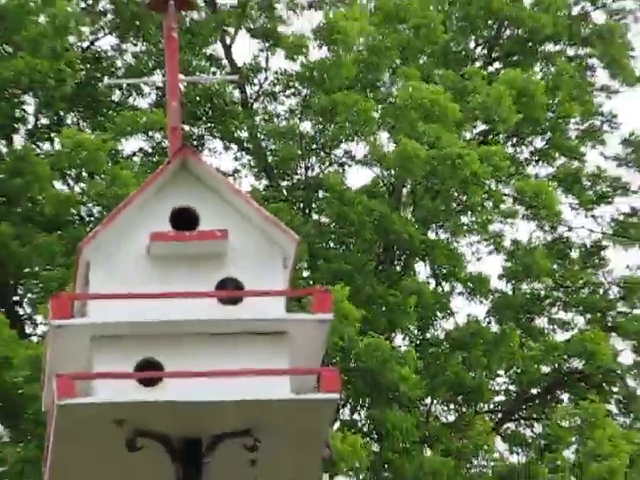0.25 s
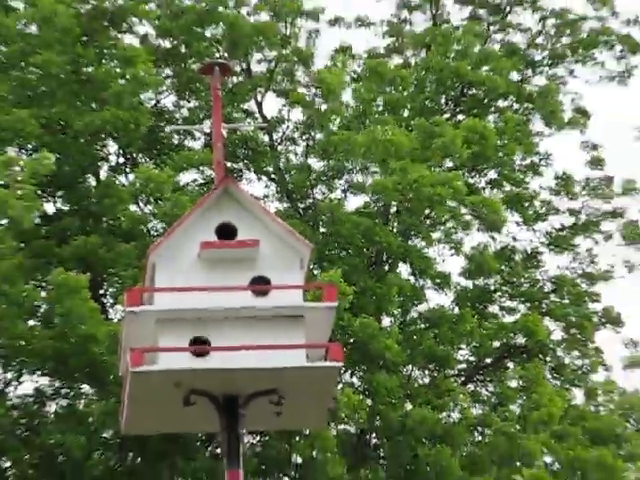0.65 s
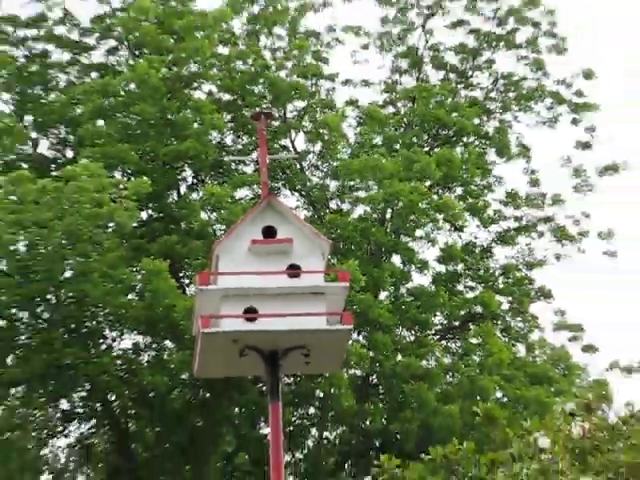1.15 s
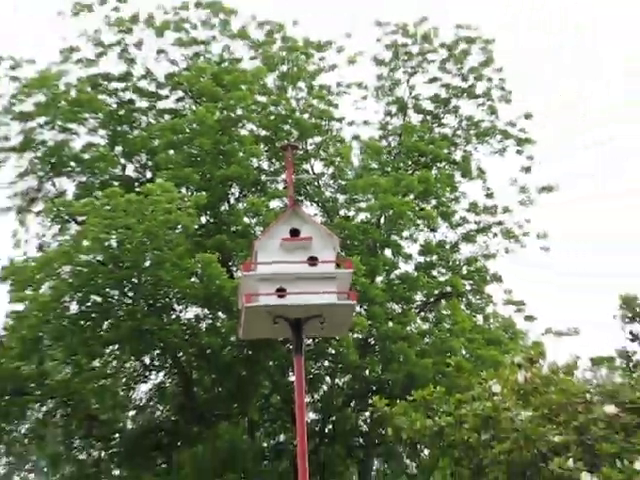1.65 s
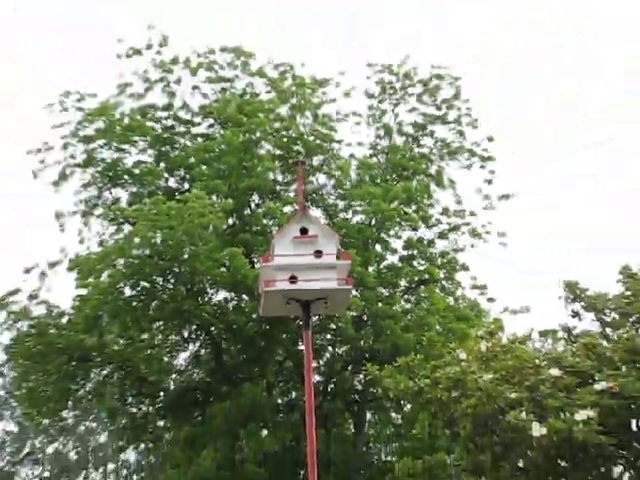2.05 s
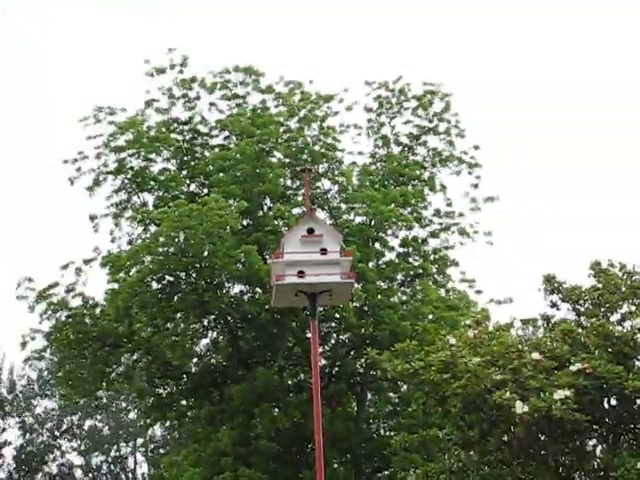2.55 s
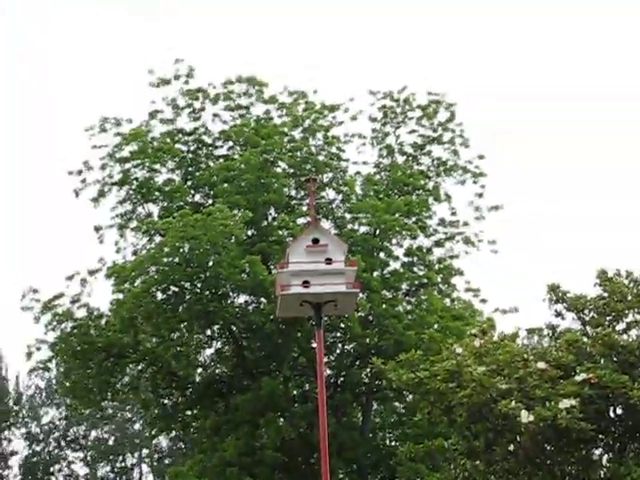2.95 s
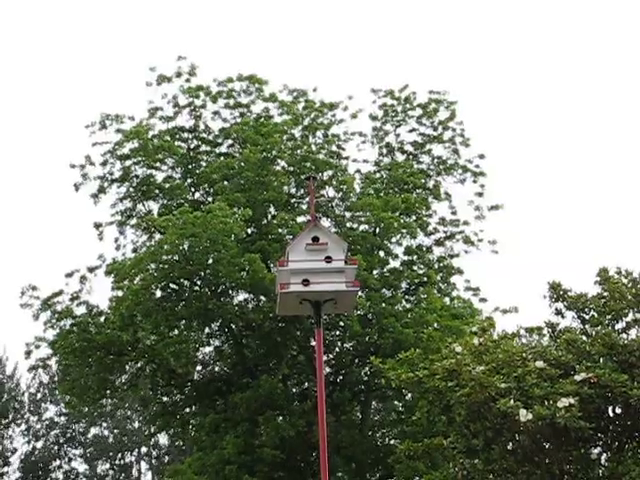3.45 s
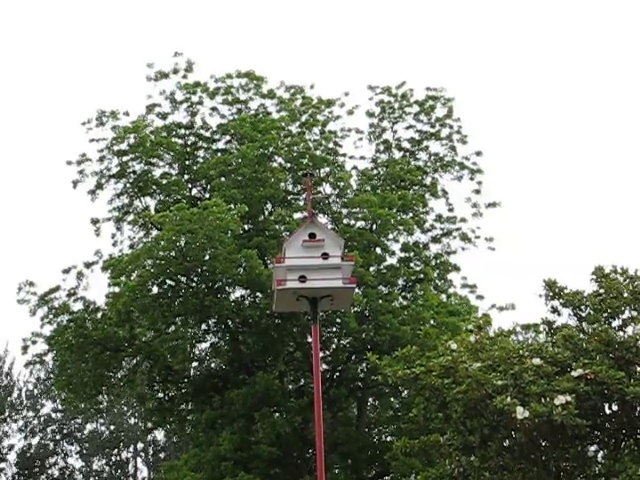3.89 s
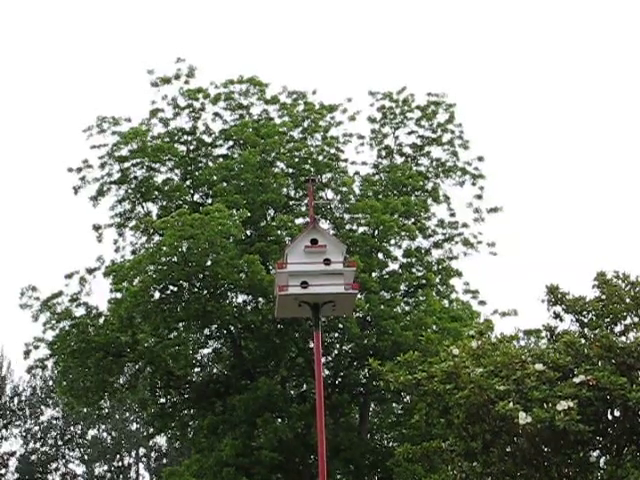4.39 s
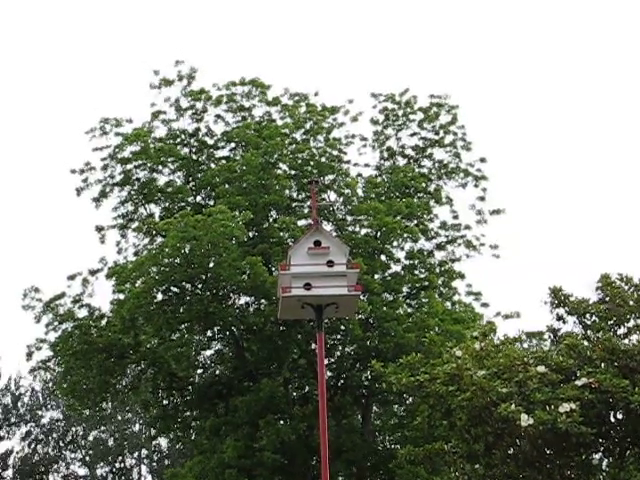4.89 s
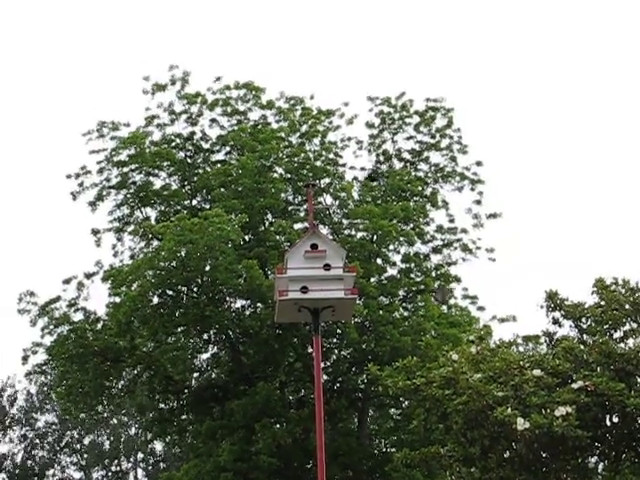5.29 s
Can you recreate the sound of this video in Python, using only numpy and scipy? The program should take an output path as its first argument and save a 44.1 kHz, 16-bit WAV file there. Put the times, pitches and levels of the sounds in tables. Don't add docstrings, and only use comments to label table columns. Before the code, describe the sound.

Purple-martin-like birds whistle, chatter and buzz around a nesting house, with loud swooping calls over soft leaf rustle and low distant engine rumble.

```python
import sys
import numpy as np
from scipy import signal
from scipy.fft import rfft, irfft, next_fast_len
from scipy.io import wavfile
from scipy.ndimage import uniform_filter1d, map_coordinates

SR = 44100
rng = np.random.default_rng(int(sys.argv[2]) if len(sys.argv) > 2 else 0)


def dump(signal):
    limited = np.clip(np.atleast_2d(signal).T, -1, 1)
    pcm = np.round(limited * 32767).astype(np.int16)
    wavfile.write(sys.argv[1], SR, pcm)


def invert_db(level):
    return 10 ** (np.asarray(level, dtype=float) / 20)


N = 243873


def along(points, hz):
    f, v = np.transpose(points)
    return np.interp(np.log(hz + 1), np.log(f + 1), v)


def unit(x):
    return x / np.sqrt(np.mean(x ** 2) + 1e-20)


def curves(rows):
    s, *cols = np.transpose(rows)
    return [np.interp(np.arange(N) / SR, s, c) for c in cols]


def wobble(rate, size=N):
    knots = rng.standard_normal(int(size * rate / SR) + 4)
    return map_coordinates(knots, [1 + np.arange(size) * rate / SR])


def filtered(x, response):
    m = next_fast_len(N + SR // 2)
    return irfft(rfft(x, m) * response(np.fft.rfftfreq(m, 1 / SR)), m)[..., :N]


def ring(modes):
    def response(f):
        return sum((-1) ** k * invert_db(db) * 1j * f * w / (c * c - f * f + 1j * f * w)
                   for k, (c, w, db) in enumerate(modes))
    return response


def add(out, s, sound, pan_db, lag_s):
    for side, mic in zip((1, -1), out):
        start = round((s + side * lag_s * pan_db) * SR)
        mic[start:start + len(sound)] += invert_db(side * pan_db / 2) * sound


# frequency in Hz, left-right likeness.
LIKENESS = [(60, 0.94), (290, 0.98), (640, 0.9), (1400, 0.68), (3100, 0.14), (6800, -0.33), (15000, 0.18)]


def rush(spectrum, patchy_db):
    z = signal.stft(rng.standard_normal((2, N + 512)), nperseg=512)[2]
    field = uniform_filter1d(rng.standard_normal(z.shape[1:]), size=6, axis=0)
    field = uniform_filter1d(field, size=12, axis=1)
    pair = signal.istft(z * invert_db(patchy_db * unit(field)), nperseg=512)[1][:, :N]

    def mid_side(hz):
        turn = np.arccos(np.clip(along(LIKENESS, hz), -1, 1)) / 2
        return invert_db(along(spectrum, hz)) * [np.cos(turn), np.sin(turn)]
    mid, side = filtered(pair, mid_side)
    return np.array([mid + side, mid - side]) / np.sqrt(np.mean(mid ** 2))


# time in seconds, breeze in dB.
BREEZE = [(0, 0.5), (.7, 2), (1.1, -1), (2.4, -0.1), (2.9, -2.2), (3.5, 1.4), (4.2, -1.8), (4.85, 1.3),
          (5.53, 0.1)]
# frequency in Hz, level in dB per Hz.
TRAFFIC_SPECTRUM = [(12, -44), (30, -4.5), (50, -2.5), (75, -0.5), (102, -8), (141, -8), (229, -15),
                    (360, -13), (536, -17), (797, -13.5), (1120, -22), (1500, -19.5), (1950, -24.5),
                    (3300, -120)]
# frequency in Hz, level in dB per Hz.
LEAF_SPECTRUM = [(590, -19), (1000, -3.5), (1140, -8.5), (2780, -2.5), (5250, -7.5), (6940, -8.5),
                 (7700, -11), (9380, -23.5), (12800, -27), (15100, -40), (16000, -46)]


def air():
    breeze_db, = curves(BREEZE)
    leaves_db = -41 + breeze_db + 0.7 * wobble(5.56)
    traffic_db = -38.5 + 0.19 * breeze_db + 0.49 * wobble(4.6)
    low = invert_db(traffic_db) * rush(TRAFFIC_SPECTRUM, patchy_db=1.0)
    return low + invert_db(leaves_db) * rush(LEAF_SPECTRUM, patchy_db=.7)


# time in seconds, firing rate in Hz,
# load in dB that leans the sound from the second order to the first.
ENGINE_RUN = [(0, 44, 2), (.2, 42.8, -4), (.95, 42.4, -3), (1.1, 42.47, 5), (1.6, 42.05, 0),
              (1.95, 43.2, 5), (2.1, 44.5, -3), (2.5, 44.9, 1), (2.65, 44.8, -5.5), (2.9, 45.45, 5),
              (4, 46.4, -6), (4.6, 46.7, -1.5), (5.53, 46.2, -1.5)]
# multiple of the firing rate, level in dB under the second order.
WEAKER_ORDERS = [(1.5, -9), (2.5, -32), (3, -28), (4, -19)]


def engine():
    rate, load_db = curves(ENGINE_RUN)
    first_db, second_db = -41.5 + 0.63 * load_db, -44 - 1.2 * load_db
    turn = 2 * np.pi * np.cumsum(rate + 0.805 * wobble(6)) / SR

    def order(k, db):
        return np.sqrt(2) * invert_db(db + 1.84 * wobble(4.83)) * np.sin(k * turn)
    weak = sum(order(k, second_db + db) for k, db in WEAKER_ORDERS)
    return order(0.93, first_db) + order(2, second_db) + weak


# multiple of the pitch, level in dB.
SYRINX_OVERTONES = [(2, -28.5), (3, -41.5), (4, -48.5), (5, -41), (6, -45), (7, -55)]


def syrinx(pitch, bright_db):
    turn = 2 * np.pi * np.cumsum(pitch) / SR
    tone = np.sin(turn)
    for k, db in SYRINX_OVERTONES:
        tone = tone + invert_db(db + bright_db) * np.sin(k * turn) * (k * pitch < SR / 2)
    return tone


def calls(rows, path, carry, attack_s, swell=((0, 0),), strain=0.87, bright_db=13):
    out = np.zeros((2, N + SR))
    release_s = 0.0013
    for s, length, first_hz, last_hz, db in rows:
        t = np.arange(round(length * SR)) / SR
        fallen = uniform_filter1d(np.interp(t / length, *np.transpose(path)), size=200)
        pitch = first_hz * (last_hz / first_hz) ** fallen
        swell_db = uniform_filter1d(np.interp(t / length, *np.transpose(swell)), size=120)
        effort_db = db + along(carry, pitch) + swell_db
        fade = np.clip(np.minimum(t / attack_s, (length - t) / release_s), 0, 1)
        tone = syrinx(pitch, bright_db=strain * effort_db + bright_db)
        add(out, s, invert_db(effort_db - 3.5) * fade * tone, -1.2, lag_s=.00001)
    return out[:, :N]


# start in seconds, length in seconds, first and last pitch in Hz, level in dB.
NEAR_SWOOPS = [
    (.014, 0.073, 4780, 1963, -10),
    (.595, 0.075, 4800, 1960, -10),
    (5.193, .058, 3450, 1690, -21),
    (5.265, 0.074, 4760, 1960, -12.5),
]
SWOOP_PATH = [(0, 0), (0.143, 0.058), (0.24, .14), (.36, .37), (0.522, .48), (.68, .72), (.85, .89),
              (1, 0.99)]
# frequency in Hz, level in dB.
SWOOP_CARRY = [(1750, -11), (2050, -10), (2250, -5.5), (2500, -5), (2870, 1), (3200, 0.5), (3600, 2),
               (4400, 0.5)]


def swoops():
    return calls(NEAR_SWOOPS, SWOOP_PATH, SWOOP_CARRY, attack_s=0.018)


def voices(notes, pan_db, sag, rise, fall, rough, bright_db, flutter_hz=0, swing=0, gate=0, fade_db=0,
           broken_db=0, smooth=False):
    out = np.zeros((2, N + SR))
    for s, length, first_hz, last_hz, db in notes:
        t = np.arange(round(length * SR)) / SR
        u, shake = t / length, wobble(300.2, size=len(t))
        beat = (flutter_hz * t + 0.026 * shake) % 1
        pitch = first_hz * (last_hz / first_hz) ** (u + sag * u * (1 - u))
        pitch *= 1 + swing * np.cos(np.pi * beat * (1 + smooth)) + 0.004 * rough * shake
        shape = np.clip(u / rise, 0, 1) * np.clip((1 - u) / fall, 0, 1)
        open_share = np.sin(np.pi * (beat + 0.14 * smooth)) ** 2
        chop = 1 - np.clip(gate, 0, 1) * (1 - open_share)
        far = np.clip(-db / 10 - 2.5, 0, 1)
        level_db = db + fade_db * (u - .3) + broken_db * far * wobble(110, size=len(t))
        swell = invert_db(level_db + 0.92 * rough * shake) * np.sin(np.pi / 2 * shape)
        add(out, s, swell * chop * syrinx(pitch, bright_db), pan_db, lag_s=.00001)
    return out[:, :N]


# start in seconds, length in seconds, first pitch in Hz, level in dB.
FALLING = [(0.024, .018, 3080, -33), (0.034, 0.022, 2910, -24), (0.267, 0.034, 3050, -30.5),
           (0.311, .036, 2720, -40), (3.385, 0.037, 2900, -32), (3.594, 0.078, 4200, -34.5),
           (4.44, 0.068, 3800, -39), (4.494, 0.049, 2840, -33.5), (4.503, 0.081, 4900, -37.5),
           (4.763, 0.067, 4260, -30.5), (4.82, 0.014, 3090, -33), (4.846, 0.019, 3100, -31),
           (4.917, 0.023, 2500, -35), (4.966, .024, 1990, -35), (4.973, 0.016, 2890, -31),
           (4.994, 0.01696, 3440, -30), (5.122, .017, 3040, -31), (5.142, 0.017, 3240, -27.5),
           (5.165, 0.021, 3133, -33), (5.259, 0.047, 2465, -34.5), (5.394, 0.0096, 2840, -34),
           (5.506, 0.015, 3640, -23.5)]
# start in seconds, length in seconds, first pitch in Hz, level in dB.
SAGGING = [(0.077, 0.022, 2890, -40), (0.661, 0.019, 2780, -31), (2.76, 0.024, 2400, -26),
           (2.799, 0.0257, 2276, -21.5), (4.466, 0.019, 5000, -43), (4.516, .024, 3900, -36),
           (4.721, 0.01, 4260, -38), (4.732, 0.012, 3620, -35), (4.814, .01, 3800, -43),
           (4.886, .012, 3450, -39), (4.94, .014, 3600, -35), (5.238, 0.0124, 3550, -34),
           (4.428, .008, 3100, -39), (4.678, 0.0083, 3325, -16), (4.702, 0.013, 2730, -22),
           (4.831, 0.013, 2225, -20.5), (4.901, 0.0155, 2898, -23.5), (5.003, 0.011, 2195, -21.5),
           (4.807, 0.013, 2000, -26.5), (5.128, 0.012, 2140, -29), (5.151, 0.013, 2230, -22.5),
           (5.349, .018, 3080, -17), (5.382, 0.0214, 3245, -32)]
# start in seconds, length in seconds, first and last pitch in Hz, level in dB.
FREE_SLIDES = [(0.281, 0.022, 4730, 3670, -40), (0.289, 0.023, 3740, 3160, -38),
               (.328, 0.022, 2730, 2900, -40.5), (0.348, .016, 1700, 1550, -40),
               (.369, .012, 2120, 2020, -41), (.384, .018, 1900, 1780, -40),
               (1.402, 0.012, 3730, 4330, -38), (1.915, 0.0081, 4070, 4540, -36),
               (1.832, 0.033, 5120, 4860, -41), (2.574, .038, 2523, 2024, -20.5),
               (2.782, 0.01, 2850, 2500, -31), (2.791, 0.009, 2690, 2170, -20),
               (2.833, 0.0318, 2084, 1793, -27), (2.976, 0.025, 1923, 2054, -27),
               (3.602, 0.032, 5120, 4800, -38), (4.709, 0.049, 5100, 2294, -34.5),
               (4.909, 0.068, 5140, 2000, -35), (4.976, 0.025, 3640, 2960, -41),
               (5.016, 0.012, 3100, 2200, -35), (4.95, .01, 3100, 2440, -37),
               (5.268, .022, 2250, 1830, -39), (5.108, .012, 2000, 1400, -35),
               (5.186, 0.01, 2800, 2500, -44), (5.19, 0.0098, 2710, 3300, -33),
               (5.224, 0.028, 4200, 3022, -36), (5.252, 0.009, 2130, 2700, -31),
               (5.284, 0.013, 2500, 2740, -25), (5.318, 0.0082, 2750, 3042, -18),
               (5.327, 0.0072, 3020, 2720, -14.5), (5.341, 0.0055, 2780, 2600, -28),
               (5.361, 0.007, 2740, 2050, -22), (5.365, 0.0071, 2270, 2700, -28),
               (5.476, 0.039, 1830, 1940, -26), (5.515, 0.058, 3080, 3050, -23.5)]
# start in seconds, length in seconds, pitch in Hz, level in dB.
LEVEL_PIPS = [(0.348, .017, 3430, -36), (1.307, 0.013, 4980, -35), (2.932, 0.028, 2643, -23),
              (2.921, .008, 2670, -36), (2.959, 0.0047, 2500, -28.5), (3.047, .012, 2620, -53),
              (3.12, 0.0088, 5300, -36), (3.218, 0.0079, 3140, -19.5), (3.249, 0.014, 2074, -17.5),
              (3.287, 0.011, 2027, -23.5), (3.878, 0.015, 4800, -37), (3.915, 0.0085, 2000, -38),
              (3.957, 0.0037, 2190, -20.5), (4.045, 0.026, 2475, -49), (4.39, 0.0086, 1827, -31.5),
              (4.845, 0.0051, 2082, -33), (4.979, .011, 1817, -29), (5.396, 0.0052, 2930, -29),
              (4.715, 0.021, 2127, -18), (4.747, 0.015, 2182, -20), (4.808, 0.032, 4930, -41)]
BOTTOM_HZ = 1744


def whistles():
    drops = [(s, length, hz, BOTTOM_HZ, db) for s, length, hz, db in FALLING]
    chirps = [(s, length, hz, .88 * hz, db) for s, length, hz, db in SAGGING]
    pips = [(s, length, hz, .98 * hz, db) for s, length, hz, db in LEVEL_PIPS]
    slides = voices(drops + chirps + FREE_SLIDES, pan_db=0.6, sag=0.202, rise=0.25, fall=0.26,
                    rough=1.4, bright_db=-2.0, broken_db=5.5)
    return slides + voices(pips, pan_db=1.1, sag=0, rise=0.23, fall=0.28, rough=0.57,
                           bright_db=1.5, broken_db=7.5)


# start in seconds, peak in dB, length in
# seconds, left-right in dB.
CHIP_BURSTS = [
    (.154, -36, .007, 0),
    (3.105, -28.5, 0.0072, -2),
    (3.677, -25, 0.012, 1),
    (3.756, -23, 0.011, -2.5),
    (3.861, -21.5, 0.011, -1.5),
]
# frequency in Hz, width in Hz, level in dB.
BEAK_MODES = [(2600, 630, 4.5), (4900, 820, 6), (7600, 610, 0), (13800, 1400, -25)]


def chips():
    out = np.zeros((2, N + SR))
    for s, db, length, pan_db in CHIP_BURSTS:
        count = round(length * SR)
        breath = signal.windows.tukey(count, .4) * rng.standard_normal(count)
        add(out, s, invert_db(db + 1.0) * breath, pan_db, lag_s=.00002)
    return filtered(out[:, :N], ring(BEAK_MODES))


def scattered(x, direct_db):
    t = np.arange(SR // 20) / SR
    t60_s = .038
    smear = rng.standard_normal((2, len(t))) * invert_db(-60 * t / t60_s)
    smear = smear / np.linalg.norm(smear[0])
    return invert_db(direct_db) * x + signal.fftconvolve(x, smear, axes=1)[:, :N]


# start in seconds, length in seconds, first and last pitch in Hz, level in dB.
NEAR_BUZZES = [
    (.425, 0.13, 3645, 3280, -21),
    (0.531, 0.061, 3370, 3530, -24.5),
    (0.561, 0.11, 3380, 2920, -26.5),
    (.642, 0.16, 3640, 2600, -15.5),
    (1.693, 0.13, 3515, 3310, -19.5),
]
# rate in Hz, pitch swing as a share, swell in dB.
BUZZ_FLUTTERS = [(129.5, 0.076, 2), (131.5, 0.11, -5), (134.6, 0.072, 2), (142, 0.07, -1),
                 (141.6, 0.058, 1.5)]
# start in seconds, length in seconds, first and last pitch in Hz, level in dB.
DISTANT_BUZZES = [(.82, .1, 3330, 3010, -43), (1.305, 0.082, 5060, 4760, -40.5),
                  (1.375, 0.049, 3500, 4050, -40), (1.434, .152, 3553, 3190, -36.5),
                  (1.86, 0.098, 3620, 4300, -46), (1.9, 0.047, 7600, 7500, -46.5),
                  (3.09, 0.14, 5430, 4330, -40)]


def buzzes():
    def buzz(notes, rate_hz, swing, swell_db):
        return voices(notes, pan_db=-1.1, sag=.9, rise=0.29, fall=0.39, rough=1.9, bright_db=-3.0,
                      flutter_hz=rate_hz, swing=swing, gate=0.57, fade_db=swell_db, smooth=True)
    near = sum(buzz([note], *flutter) for note, flutter in zip(NEAR_BUZZES, BUZZ_FLUTTERS))
    return near + scattered(buzz(DISTANT_BUZZES, 141, .075, 0), direct_db=-1)


def strokes(phrases, again_s, again_db, tire_db, fade_db, again_top_hz, first_s, first_db):
    rows = []
    for s, period, hz, rise_hz, widen, db in phrases:
        for k in range(4):
            start = s + k * period + k * (k - 1) * widen
            level_db = db + first_db * (k == 0) + tire_db * (k == 3)
            rows.append((start, .015 if k else first_s, hz + k * rise_hz, BOTTOM_HZ, level_db))
    once = voices(rows, pan_db=0.3, sag=-0.3, rise=0.38, fall=0.068, rough=3.7, bright_db=16.0,
                  fade_db=fade_db)

    def again(hz):
        return np.exp(-2j * np.pi * hz * again_s) / (1 + (hz / again_top_hz) ** 8)
    return once + invert_db(again_db) * filtered(once, again)


# start in seconds, stroke period in seconds, first pitch in Hz,
# widening of each gap in seconds, level in dB.
HIDDEN_PHRASES = [
    (.451, .0255, 3270, 0.00025, -18.5),
    (0.988, .018, 3560, 0.003, -19.5),
]
# start in seconds, stroke period in seconds, first pitch in Hz,
# rise in Hz a stroke, level in dB.
OPEN_PHRASES = [
    (3.444, .0252, 2895, 72.14, -21),
    (4.606, 0.024, 2800, 120, -20.5),
]
# frequency in Hz, level in dB.
OPEN_BEAK = [(1500, 0.5), (2200, -1.5), (2800, 3), (3300, -3), (4500, -8), (7000, -12), (10000, -11),
             (14000, -9.5)]


def chatter():
    rising = [(s, period, hz, rise_hz, 0, db) for s, period, hz, rise_hz, db in OPEN_PHRASES]
    sinking = [(s, period, hz, -60, widen, db - 2.0) for s, period, hz, widen, db in HIDDEN_PHRASES]
    clear = strokes(rising, again_s=0.012, again_db=-4, tire_db=0, fade_db=-5, again_top_hz=2100,
                    first_s=.016, first_db=-4)
    hidden = strokes(sinking, again_s=.0078, again_db=-4.5, tire_db=-2, fade_db=-13, again_top_hz=3300,
                     first_s=0.015, first_db=1.0)
    both = clear + scattered(hidden, direct_db=.5) * invert_db(-.6)
    return filtered(both, lambda hz: invert_db(along(OPEN_BEAK, hz)))


# start in seconds, length in seconds, first and last pitch in Hz, level in dB.
STALLED_DIVE = [
    (.741, .068, 4270, 1748, -13.5),
]
STALLED_PATH = [(0, .03), (.09, 0), (.25, .29), (.5, .44), (.71, .57), (.79, .82), (1, 1)]
# frequency in Hz, level in dB.
STALLED_CARRY = [(1750, -17), (2050, -1), (2400, -1.5), (2650, -6), (2850, 5.5), (3300, -2.5), (3800, -4),
                 (4300, 0)]


def stalled_dive():
    return calls(STALLED_DIVE, STALLED_PATH, STALLED_CARRY, attack_s=0.0054)


# start in seconds, length in seconds, first and last pitch in Hz, level in dB.
CALL_STEPS = [(1.638, .011, 3030, 2600, -24.5), (1.648, .011, 2550, 1950, -27),
              (1.651, 0.0094, 2694, 2530, -22), (1.66, 0.014, 3120, 2650, -22),
              (1.674, 0.02, 2800, 2270, -19), (1.696, .019, 2035, 1790, -25.5),
              (1.727, 0.015, 2590, 2240, -20.5), (2.106, 0.014, 3120, 2690, -17.5),
              (2.117, 0.013, 2600, 2030, -29), (2.12, 0.0081, 2703, 2550, -16.5),
              (2.127, 0.013, 3200, 2610, -17.5), (2.139, 0.033, 2710, 2274, -16.5),
              (2.162, 0.018, 2050, 1770, -26.5), (2.186, 0.029, 2534, 2280, -21)]


def stepped_calls():
    return voices(CALL_STEPS, pan_db=1.2, sag=0.32, rise=0.26, fall=0.19, rough=0.81, bright_db=1.5)


# start in seconds, peak in dB, length in seconds, left-right in dB.
SCRAPES = [
    (2.202, -44, 0.002, 1),
    (2.29, -36.5, 0.0014, 12),
    (2.348, -34.5, 0.0027, 7),
    (2.353, -31, .0018, 4.5),
]
# start in seconds, peak in dB, pitch in Hz, left-right in dB.
SHELL_KNOCKS = [
    (2.203, -28.5, 830, -2),
    (2.2915, -25.5, 920, 12),
    (2.299, -27, 950, 8),
    (2.349, -24.5, 1200, 6),
    (2.358, -28.5, 940, 8),
]
# frequency in Hz, width in Hz, level in dB.
SHELL_MODES = [(4800, 1200, 1.5), (7950, 1400, 0.5), (13000, 4500, -8)]


def ticks():
    crack, knock = np.zeros((2, 2, N + SR))
    t = np.arange(SR // 30) / SR
    for s, db, length, pan_db in SCRAPES:
        scrape = rng.standard_normal(len(t)) * t / length * np.exp(1 - t / length * 1.7)
        scrape = np.convolve(scrape / np.abs(scrape).max(), [.5, .5], 'same')
        add(crack, s, invert_db(db + 16.5) * scrape, pan_db, lag_s=.00003)
    t60_s, attack_s = 0.032, 0.00047
    for s, db, hz, pan_db in SHELL_KNOCKS:
        decay = invert_db(db - 60 * t / t60_s) * (1 - np.exp(-t / attack_s))
        add(knock, s, decay * np.sin(2 * np.pi * hz * t), pan_db, lag_s=0)
    return knock[:, :N] + filtered(crack[:, :N], ring(SHELL_MODES))


# start in seconds, length in seconds, first and last pitch in Hz, level in dB.
LOUD_DIVES = [
    (2.512, 0.063, 3830, 1736, -15),
]
DIVE_PATH = [(0, 0), (.05, 0.069), (.25, 0.28), (.47, .5), (.62, .62), (.82, 0.87), (1, 0.96)]
# frequency in Hz, level in dB.
DIVE_CARRY = [(1750, -4), (2050, -12.5), (2400, -0.5), (2520, 0.5), (2620, 0.5), (2720, 0), (2860, 8),
              (3030, -2)]


def dives():
    return calls(LOUD_DIVES, DIVE_PATH, DIVE_CARRY, attack_s=0.014)


# start in seconds, length in seconds, first and last pitch in Hz, level in dB.
RASP_LOW_VOICE = [
    (3.337, 0.072, 3010, 2854, -17),
    (3.392, 0.046, 2751, 2420, -22),
]
# start in seconds, length in seconds, first and last pitch in Hz, level in dB.
RASP_HIGH_VOICE = [
    (3.334, 0.077, 4120, 3420, -22.5),
    (3.408, 0.018, 3750, 3534, -28),
]


def rasp():
    low = voices(RASP_LOW_VOICE, pan_db=9.5, sag=0.063, rise=0.14, fall=0.54, rough=1.1, bright_db=-4,
                 flutter_hz=123.4, swing=0.057, gate=0.96, fade_db=6)
    high = voices(RASP_HIGH_VOICE, pan_db=11.5, sag=0.11, rise=0.08, fall=0.7, rough=1.3, bright_db=9,
                  flutter_hz=121.0, swing=0.15, gate=0.9)
    return scattered(low + high, direct_db=3) / 2


# start in seconds, length in seconds, first and last pitch in Hz, level in dB.
LEFT_STROKES = [
    (3.789, .024, 4220, 2170, -26.5),
    (3.818, 0.026, 3630, 1990, -26),
    (3.841, 0.013, 3626, 2104, -25.5),
    (3.858, 0.014, 3070, 1920, -33),
]


def left_strokes():
    return voices(LEFT_STROKES, pan_db=8.5, sag=0.082, rise=0.11, fall=0.16, rough=0.76, bright_db=-1,
                  fade_db=-3)


# start in seconds, length in seconds, first and last pitch in Hz, level in dB.
HELD_NOTE = [
    (3.993, 0.043, 2450, 2483, -19),
]


def held_note():
    return voices(HELD_NOTE, pan_db=0.7, sag=0, rise=.2, fall=0.38, rough=.5, bright_db=4.5)


# start in seconds, length in seconds, first and last pitch in Hz, level in dB.
STRAIGHT_CALL = [
    (4.2, 0.107, 3170, 2310, -5.5),
]
STRAIGHT_PATH = [(0, 0.027), (.25, 0.15), (.6, .56), (.8, .8), (1, 0.98)]
# share of length, level in dB.
STRAIGHT_LEVEL = [(0, -10), (.3, -8), (.405, 3.2), (.52, -9), (.6, -14), (.655, 0), (.72, -22),
                  (.79, -5.5), (1, -14)]


def straight_call():
    return calls(STRAIGHT_CALL, STRAIGHT_PATH, [(1000, 0)], attack_s=0.006, swell=STRAIGHT_LEVEL,
                 strain=-.7, bright_db=-3)


def flock(count):
    when, length, high, size = rng.random((count, 4)).T
    first_s, last_s = 4.4, 5.46
    rows = zip(first_s + when * (last_s - first_s), 0.0121 + 0.0195 * length,
               2500 + 1500 * high, 1800 + 700 * high, -45.5 + 5 * size)
    far = voices(rows, pan_db=0, sag=0.2, rise=0.27, fall=0.32, rough=1.3, bright_db=-7, broken_db=4.0)
    return scattered(far, direct_db=-3.5)


# start in seconds, length in seconds, first and last pitch in Hz, level in dB.
LOW_WHISTLES = [
    (4.428, 0.056, 1518, 1400, -31.5),
    (4.957, 0.11, 1566, 1368, -38),
    (5.105, 0.0146, 1772, 1320, -41),
]


def mellow_whistles():
    return voices(LOW_WHISTLES, pan_db=0.0, sag=0.15, rise=.15, fall=0.25, rough=.6, bright_db=-4)


# frequency in Hz, level in dB.
SNAP_COLOUR = [(1000, -20), (4000, -2), (8000, 1), (15000, 1)]


def snap():
    out = np.zeros((2, N))
    add(out, 5.3891, invert_db(-8) * np.ones(1), 4.5, lag_s=.00001)
    return filtered(out, lambda hz: invert_db(along(SNAP_COLOUR, hz)))


# delay in seconds, left level in dB, right level in dB.
GROUND_AND_WALLS = [(.0046, -6.5, -9), (0.0105, -12.5, -21), (0.022, -30, -33)]
# frequency in Hz, level in dB.
THROAT_AND_AIR = [(1500, 0), (3500, 5), (4600, -0.5), (5400, -3), (6800, 13), (8200, 1.5), (10000, 3),
                  (12300, 5), (14200, 2.5), (16000, -2)]
# frequency in Hz, left-right in dB.
BODY_SHADE = [(1800, -1), (2500, -1), (3500, -4), (5000, -3), (12000, 5.5)]


def birds():
    song = swoops() + whistles() + buzzes() + chatter() + stalled_dive() + stepped_calls() + dives()
    song += left_strokes() + held_note() + flock(count=26) + mellow_whistles()

    def bounce(hz):
        return 1 + sum(invert_db([[left_db], [right_db]]) * np.exp(-2j * np.pi * hz * s)
                       for s, left_db, right_db in GROUND_AND_WALLS)

    def throat(hz):
        shade_db = along(BODY_SHADE, hz) * [[.5], [-.5]]
        return invert_db(along(THROAT_AND_AIR, hz) + shade_db - 3.0)
    return filtered(filtered(song, bounce) + straight_call() + rasp(), throat)


# frequency in Hz, time to fall 60 dB in seconds.
TREE_DECAY = [(1500, 0.22), (3000, 0.68), (8000, 0.91)]


def trees(x, delay_s):
    hz, t, z = signal.stft(rng.standard_normal((2, SR // 2)), SR, nperseg=256)
    tail = signal.istft(z * invert_db(-60 * t / along(TREE_DECAY, hz)[:, None]), SR, nperseg=256)[1]
    late = np.pad(x.mean(axis=0), (round(delay_s * SR), 0))[None]
    return signal.fftconvolve(late, tail / np.linalg.norm(tail[0]), axes=1)[:, :N]


def scene():
    song = birds() + chips()
    return song + invert_db(-13.5) * trees(song, delay_s=0.008) + ticks() + snap() + engine() + air()


def top_cut(x):
    return signal.sosfilt(signal.butter(12, 15850, fs=SR, output="sos"), x)


def record(dry):
    top_hz = 15850
    mix = filtered(dry, lambda hz: hz < top_hz)
    return top_cut(mix)


dry = scene()
out = record(dry)
dump(out)
```